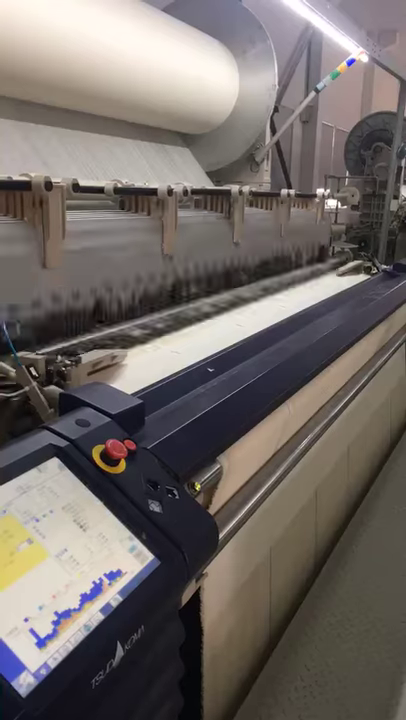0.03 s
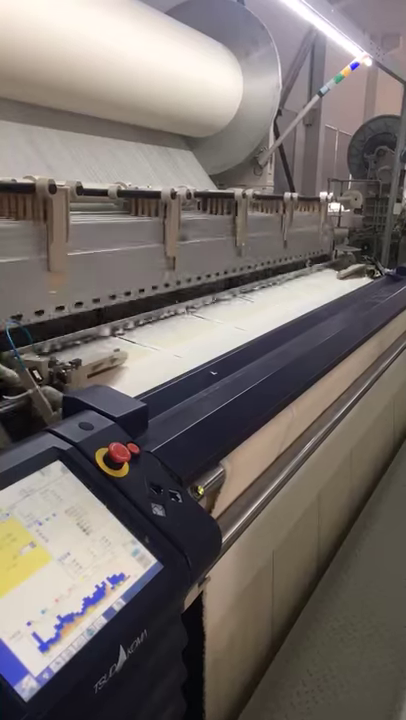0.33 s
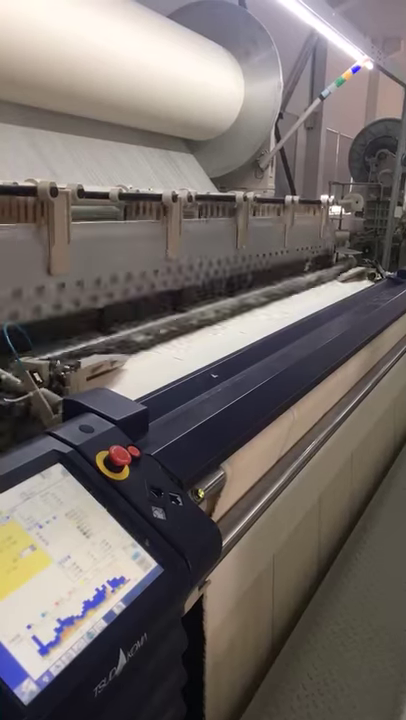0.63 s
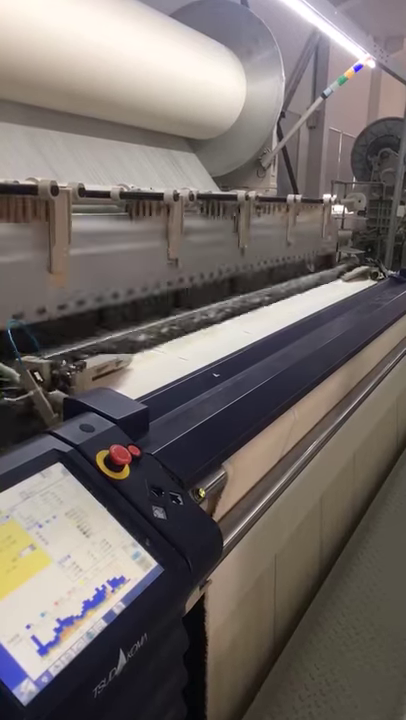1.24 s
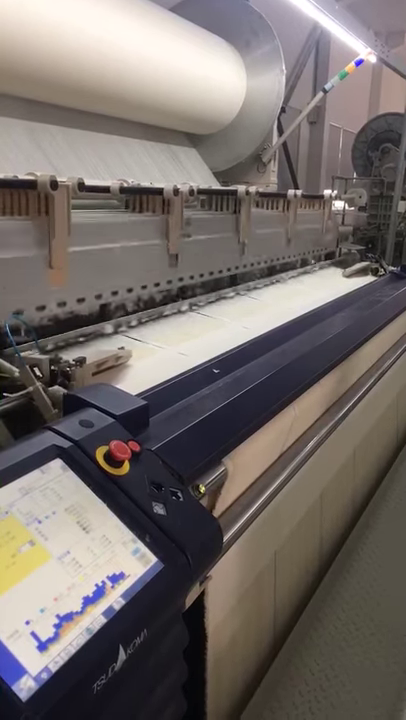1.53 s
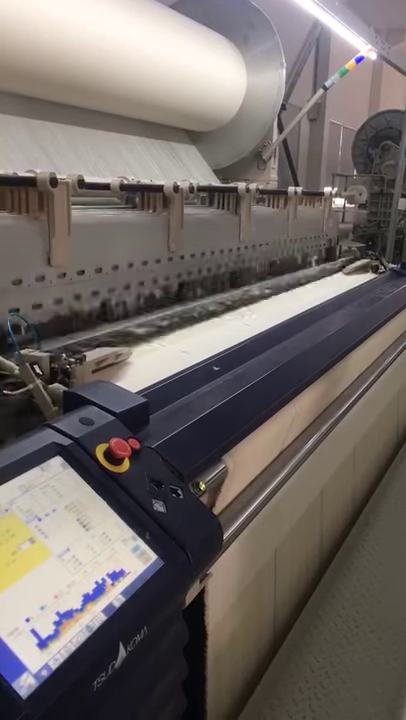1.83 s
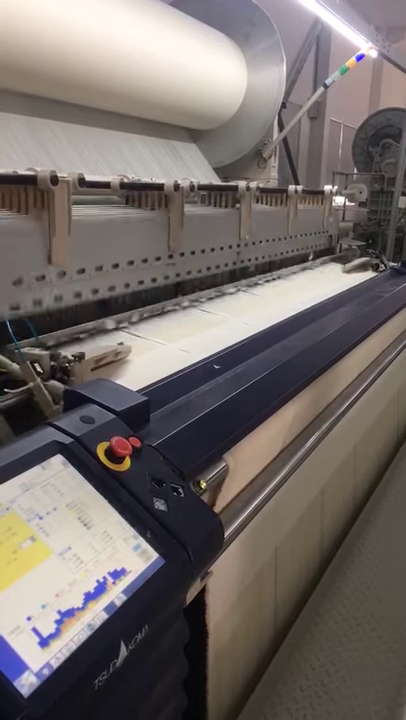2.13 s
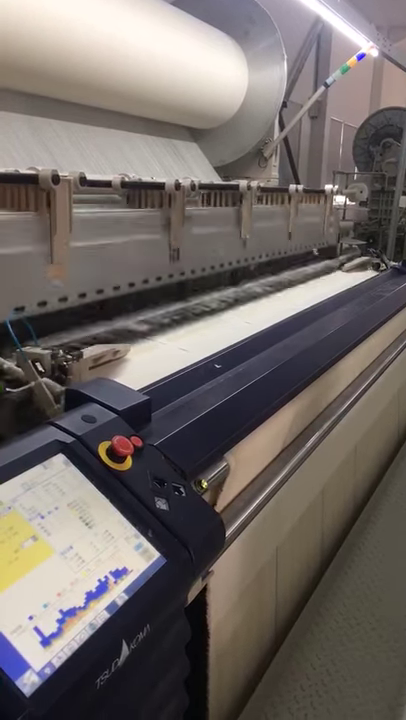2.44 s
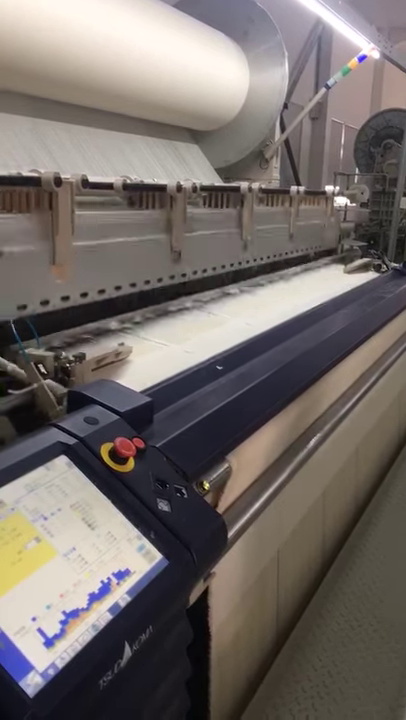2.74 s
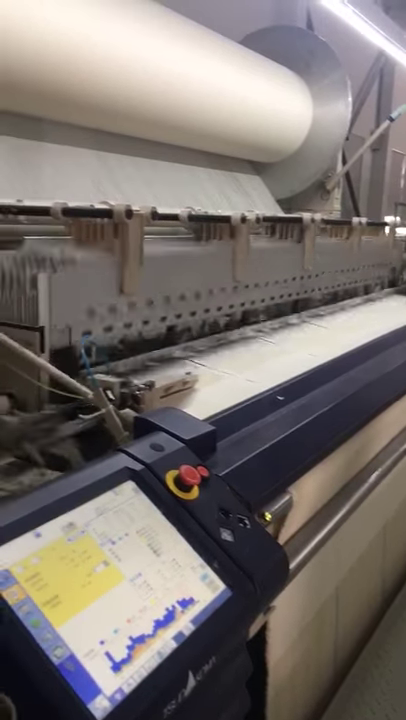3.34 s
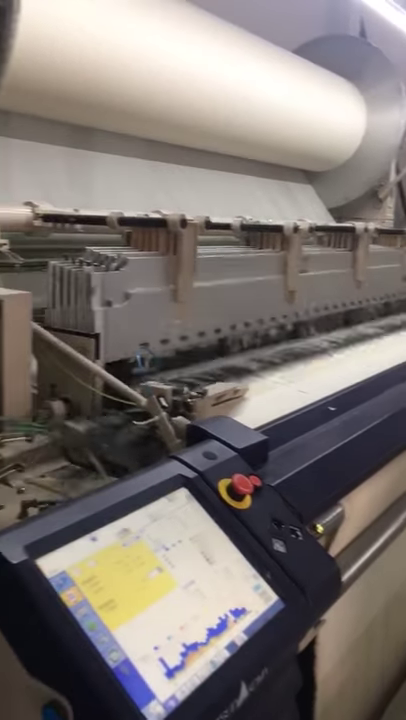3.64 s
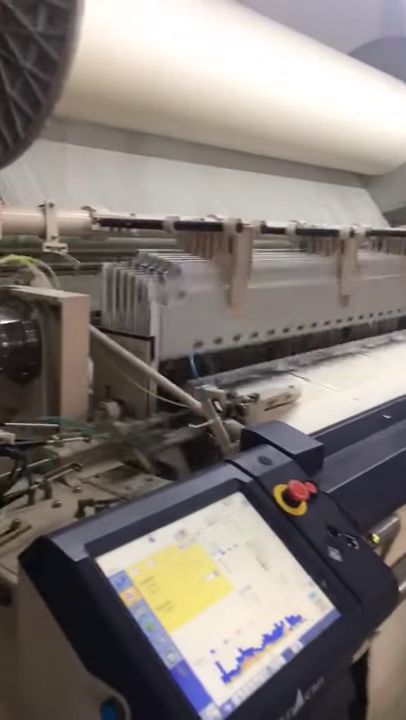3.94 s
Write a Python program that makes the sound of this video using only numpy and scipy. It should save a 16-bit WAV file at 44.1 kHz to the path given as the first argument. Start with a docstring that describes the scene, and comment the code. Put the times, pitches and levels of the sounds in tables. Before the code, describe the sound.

A loud power loom cuts in close by at about 0.2 seconds, slightly louder at first, and runs steadily until the end at about 4 seconds. Roughly four times a second it spits a hiss of air and its steel parts clatter and ring. Two slower, heavier looms thud and rattle out of step with it, over the continuous roar and low hum of machines in the hall.

```python
"""A power loom runs close by in a weaving hall: at every pick a turbulent jet of air spits, then reed
and heald frames clatter as their steel parts collide and ring. Two slower, heavier looms thud and
rattle out of step with it, each repeating its own pattern of impacts. Beneath them the far machines
blend into a roar, with droning frames and a drive hum. The sound cuts in abruptly, louder at first."""
import sys
import numpy as np
from scipy import signal
from scipy.fft import rfft, irfft, next_fast_len
from scipy.io import wavfile
from scipy.ndimage import map_coordinates

SR = 44100
rng = np.random.default_rng(int(sys.argv[2]) if len(sys.argv) > 2 else 0)


def master_out(mix):
    """Clip the mix to full scale and print it as 16-bit PCM to the path in sys.argv[1]."""
    frames = np.transpose(np.atleast_2d(mix))
    ceiling = np.clip(frames, -1, 1)
    pcm = np.round(ceiling * 32767).astype(np.int16)
    wavfile.write(sys.argv[1], SR, pcm)


N = 176400

PICK_S, FIRST_PICK_S = .23855, .0485  # cycle of the near loom
KNOCKS = dict(per_s=130, spread_db=2, t60_s=.035)  # impacts in both slower looms


def amp(db):
    """Amplitude grows tenfold for every 20 dB."""
    return 10 ** (np.asarray(db) / 20)


def unit(x):
    """Normalisation to an rms of 1."""
    return x / np.sqrt(np.mean(x ** 2) + 1e-20)


def filtered(x, response):
    """Linear filtering multiplies the spectrum by a frequency response."""
    size = next_fast_len(N + SR // 2)
    return irfft(rfft(x, size) * response(np.fft.rfftfreq(size, 1 / SR)), size)[:N]


def coloured(x, spectrum):
    """Spectral shaping by (Hz, dB) points on a logarithmic frequency axis, at rms 1."""
    freqs, db = np.transpose(spectrum)
    return unit(filtered(x, lambda hz: amp(np.interp(np.log(hz + 1), np.log(freqs), db))))


def wobble(per_s):
    """Slow modulation: a smooth curve through random knots."""
    knots = rng.standard_normal(int(N * per_s / SR) + 4)
    return map_coordinates(knots, [np.arange(N) * per_s / SR])


def stroke(shape, period_s, first_s=0):
    """A periodic envelope: each stroke adds in power to the exponential tail of the one before."""
    delay, attack, hold, decay, db = shape
    t = (np.arange(N) / SR - first_s - delay) % period_s
    power = 0
    for age in (t, t + period_s):
        rise = np.clip(age / attack, 0, 1)
        fall = np.exp(-np.maximum(age - attack - hold, 0) / decay)
        power += (rise * fall) ** 2
    return amp(db) * np.sqrt(power)


def rattle(per_s, spread_db, t60_s):
    """Shot noise: random, uneven contacts each release a dying burst of noise."""
    hits = rng.random(N) < per_s / SR
    energy = hits * amp(spread_db * np.clip(rng.standard_normal(N), -2, 2)) ** 2
    power = signal.lfilter([1], [1, -np.exp(-2 * np.log(1000) / (t60_s * SR))], energy)
    return unit(np.sqrt(power) * rng.standard_normal(N))


def repeating(x, period_s):
    """Periodic motion makes the same contacts in every cycle."""
    return np.resize(x[SR:SR + round(period_s * SR)], N)


def air_jets():
    """Turbulence hisses: the main nozzle spits once a pick, and softer relay jets follow."""
    # Each stroke: delay, attack, hold and decay time in seconds, level in dB.
    main_jet = (-.003, .009, .008, .04, -15.1)
    relay_jets = (.098, .03, .012, .075, -20.8)
    # Each row: time in seconds, jet strength in dB.
    jet_strength = [(.3, -1.5), (1.0, -.3), (1.25, -.8), (1.73, -.4), (2.0, .8), (2.45, 1.1), (2.9, .3),
                    (3.64, .6), (3.9, -.4)]
    # Each row: frequency in Hz, relative level of the hiss in dB.
    hiss_spectrum = [(1000, -14), (3000, -7), (5800, -1.5), (7500, -2), (9500, -1.8), (11500, -3.2),
                     (13500, 0), (15500, 1.2)]
    envelope = np.hypot(stroke(main_jet, PICK_S, FIRST_PICK_S), stroke(relay_jets, PICK_S, FIRST_PICK_S))
    strength = amp(np.interp(np.arange(N) / SR, *np.transpose(jet_strength)))
    return strength * envelope * coloured(rng.standard_normal(N), hiss_spectrum)


def clatter():
    """Impact noise: healds and reed rattle as the shed opens and as the weft is beaten up."""
    # Each stroke: delay, attack, hold and decay time in seconds, level in dB.
    shedding = (-.022, .022, .028, .04, -23.3)
    beat_up = (.08, .028, .025, .05, -22.6)
    envelope = np.hypot(stroke(shedding, PICK_S, FIRST_PICK_S), stroke(beat_up, PICK_S, FIRST_PICK_S))
    return envelope * steel()


def steel(ring_db=-4):
    """Colliding steel radiates broadband ticks and ringing tones into the hall."""
    # Each row: frequency in Hz, relative level of the ticks in dB.
    tick_spectrum = [(300, -14), (750, -8), (1150, -1), (1850, .8), (2600, -2.7), (4000, -1), (5800, -6.5),
                     (8000, -14), (16000, -18)]
    ticks = coloured(rattle(per_s=420, spread_db=4, t60_s=.012), tick_spectrum)
    return in_hall(ticks + amp(ring_db) * ringing())


def ringing(hits_per_s=16, t60_s=.06):
    """Damped free vibration: each small steel part is struck at its own random moments."""
    # Each row: natural frequency in Hz, relative level in dB.
    heald_modes = [(1040, -3), (1140, -1), (1215, -1), (1310, 0), (1555, 0), (1605, 0), (1700, -1),
                   (1780, -1), (1865, -1), (1970, -3), (2110, -3), (2440, -4), (3610, -4), (3800, -4)]
    t = np.arange(SR // 4) / SR
    fade = np.exp(-np.log(1000) * t / t60_s)
    rings = np.zeros(N)
    for hz, db in heald_modes:
        hits = (rng.random(N) < hits_per_s / SR) * rng.uniform(.5, 1, N)
        rings += amp(db) * signal.fftconvolve(hits, fade * np.sin(2 * np.pi * hz * t))[:N]
    return unit(rings)


def in_hall(direct, t60_s=.6, reverb_db=-4):
    """Reverberation: diffuse, decaying reflections join the direct sound; the sum has rms 1."""
    t = np.arange(SR // 2) / SR
    tail = rng.standard_normal(len(t)) * np.exp(-np.log(1000) * t / t60_s)
    reverb = signal.fftconvolve(direct, tail / np.linalg.norm(tail))[:N]
    return unit(direct + amp(reverb_db) * reverb)


def heavy_loom(pick_s=.3591):
    """Forced vibration: knocks recurring every one or two picks shake a frame, and steel clacks."""
    # Each stroke: delay, attack, hold and decay time in seconds, level in dB.
    thud = (-.01, .028, .06, .06, -21)
    rebound = (.275, .03, .04, .45, -25.2)
    clack = (.14, .014, .015, .05, -24.7)
    shedding = (.255, .018, .035, .11, -24.3)
    # Each row: frequency in Hz, relative response of the frame in dB.
    frame_spectrum = [(15, -35), (28, -2), (45, 3), (64, 4), (76, -1), (105, -3), (140, -7), (220, -4),
                      (310, -8), (420, -6), (700, -19), (2000, -40)]
    knocks = sum(repeating(rattle(**KNOCKS), picks * pick_s) for picks in (1, 2))
    frame = np.hypot(stroke(thud, pick_s), stroke(rebound, pick_s)) * coloured(knocks, frame_spectrum)
    clacks = np.hypot(stroke(clack, pick_s), stroke(shedding, pick_s)) * steel()
    return frame + clacks


def third_loom(pick_s=.38865):
    """Periodic impacts: the slowest loom knocks through a pattern two picks long."""
    # The stroke: delay, attack, hold and decay time in seconds, level in dB.
    beat = (.105, .008, .04, .6, -24.3)
    # Each row: frequency in Hz, relative level of the knocks in dB.
    knock_spectrum = [(40, -20), (100, -4), (160, -4), (205, 2), (270, -2), (440, 0), (750, -9), (1300, -6),
                      (3000, -16), (9000, -35)]
    knocks = repeating(rattle(**KNOCKS), 2 * pick_s)
    return stroke(beat, pick_s) * coloured(knocks, knock_spectrum)


def far_machines(roar_db=-16, hum_hz=64.3, hum_db=-37.5):
    """Incoherent sources blend into a roar; frames drone at resonance and a drive hums unsteadily."""
    # Each row: frequency in Hz, relative level of the roar in dB.
    roar_spectrum = [(12, -40), (26, -3), (52, 1), (130, -3.5), (220, -1.7), (480, -3.2), (760, -7.5),
                     (1150, -2), (1750, -1.8), (2600, -5.8), (4000, -7.6), (6500, -13.8), (8500, -14),
                     (12000, -16), (15500, -13.3)]
    # Each row: resonance frequency in Hz, half-width in Hz, level in dB.
    frame_modes = [(203, 9, -34), (232, 8, -37), (420, 16, -36), (459, 7, -39)]
    roar = amp(roar_db + .4 * wobble(25)) * coloured(rng.standard_normal(N), roar_spectrum)
    drone = np.zeros(N)
    for centre, width, db in frame_modes:
        mode = filtered(rng.standard_normal(N), lambda hz: 1 / (1 + ((hz - centre) / width) ** 2))
        drone += amp(db) * unit(mode)
    hum = np.sqrt(2) * np.sin(2 * np.pi * hum_hz * np.arange(N) / SR + .6 * wobble(5))
    return roar + drone + amp(hum_db + 2 * wobble(6)) * hum


def scene():
    """Superposition: the pressures of all the machines add at one point."""
    return (air_jets() + clatter() + heavy_loom() + third_loom() + far_machines())[None]


def record(dry, start_s=.1712, top_hz=16020):
    """Resonance in the microphone port colours a band-limited sound that cuts in and then settles."""
    # Each row: centre of a peak or notch in Hz, width in Hz, gain in dB.
    port_bands = [(3320, 130, -3), (3880, 320, 2.2), (4900, 300, -5), (5700, 250, 2.7), (7550, 300, -1.5),
                  (8400, 200, .8), (10400, 230, -4.8)]
    # Each row: time in seconds, overall gain in dB.
    settling = [(.17, 4), (.21, 1.7), (.55, 1.4), (1.2, 0), (2.6, -.3), (3.3, -.3), (4, .1)]

    def port(hz):
        return amp(sum(db * np.exp(-.5 * ((hz - f) / width) ** 2) for f, width, db in port_bands))

    t = np.arange(N) / SR
    gain = amp(np.interp(t, *np.transpose(settling))) * (t >= start_s)
    sound = np.clip(gain * filtered(dry[0], port), -1, 1)
    return filtered(sound, lambda hz: np.clip((top_hz - hz) / 100 + .5, 0, 1))[None]


dry = scene()
out = record(dry)
master_out(out)
```